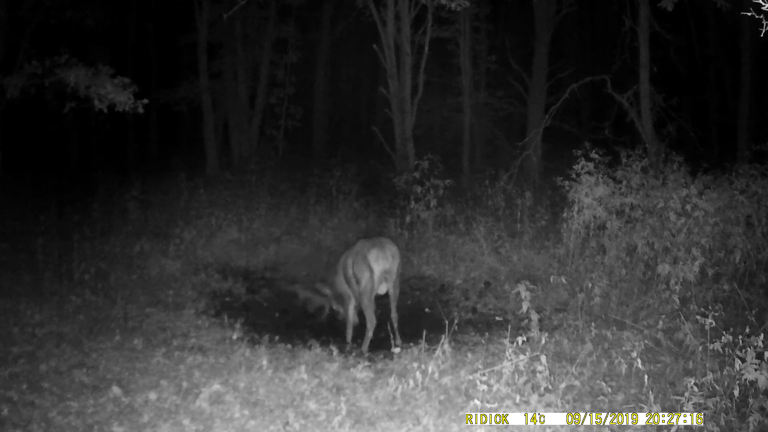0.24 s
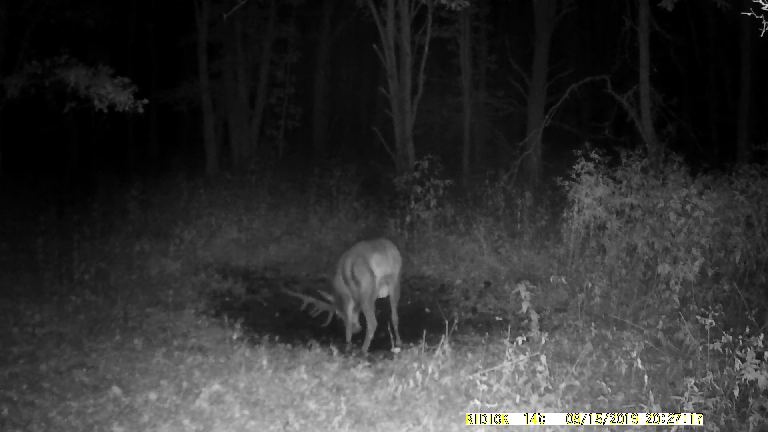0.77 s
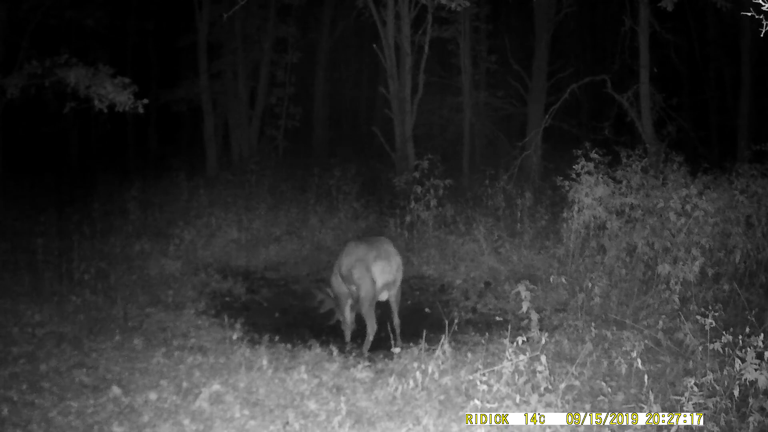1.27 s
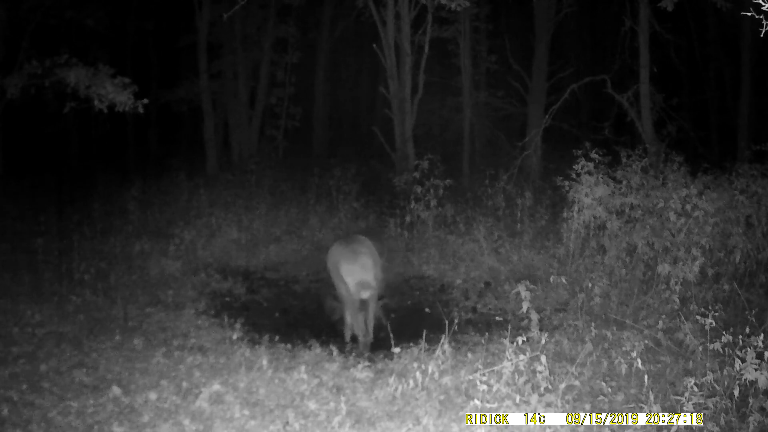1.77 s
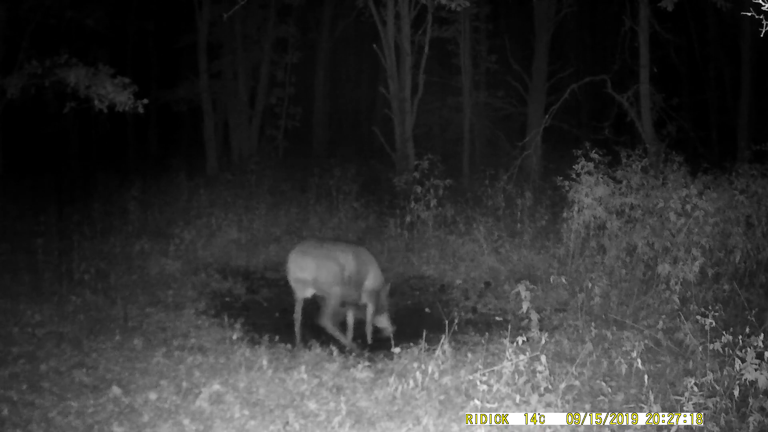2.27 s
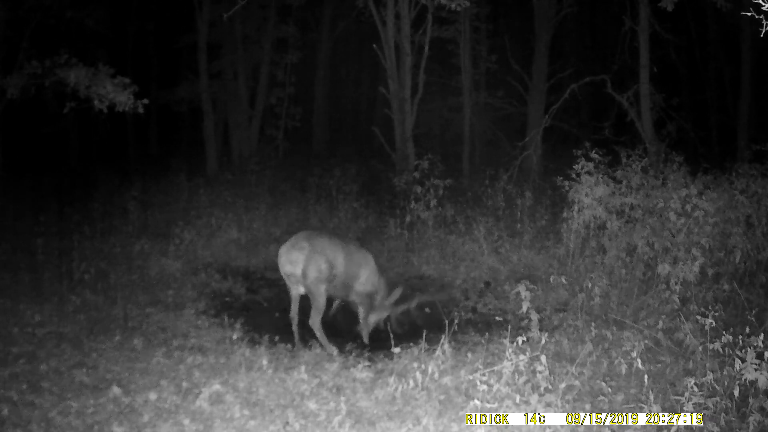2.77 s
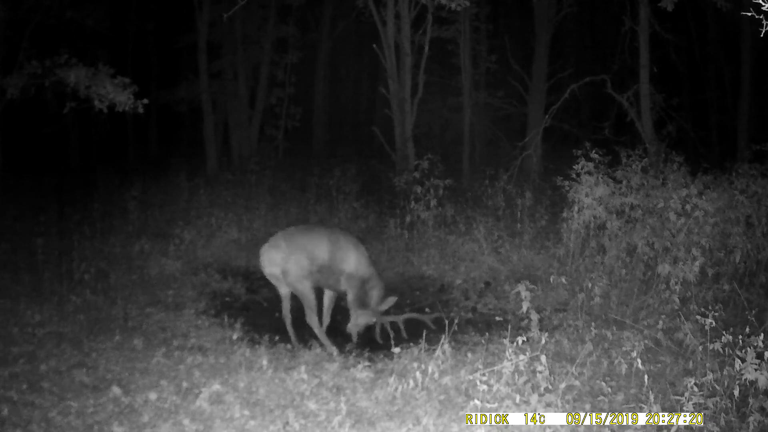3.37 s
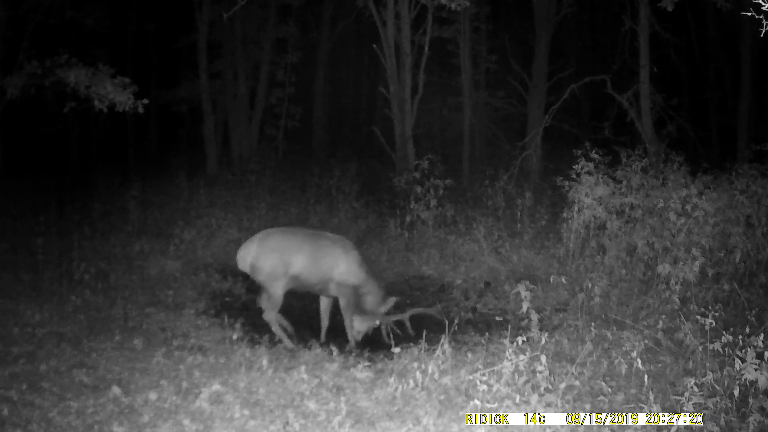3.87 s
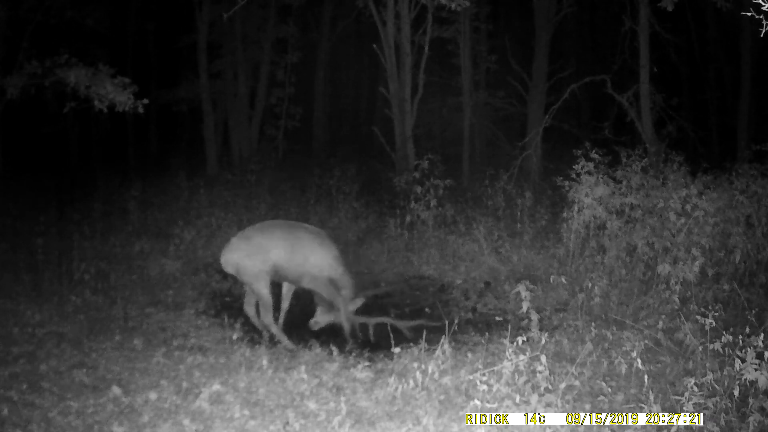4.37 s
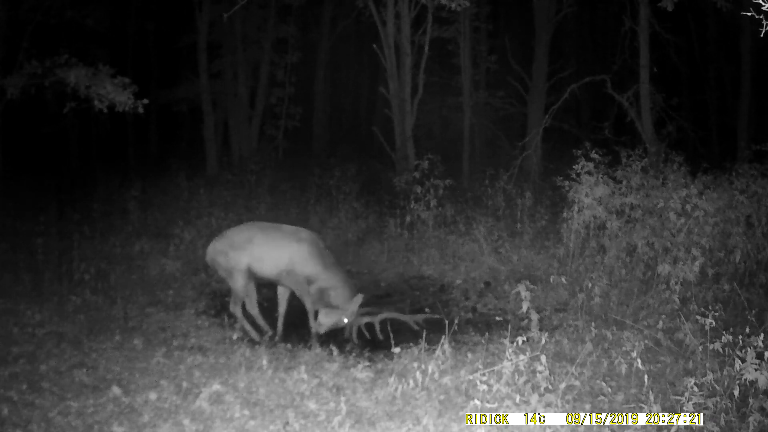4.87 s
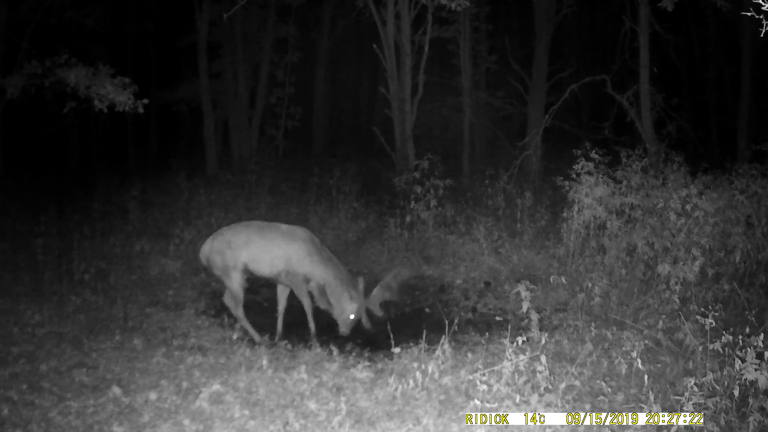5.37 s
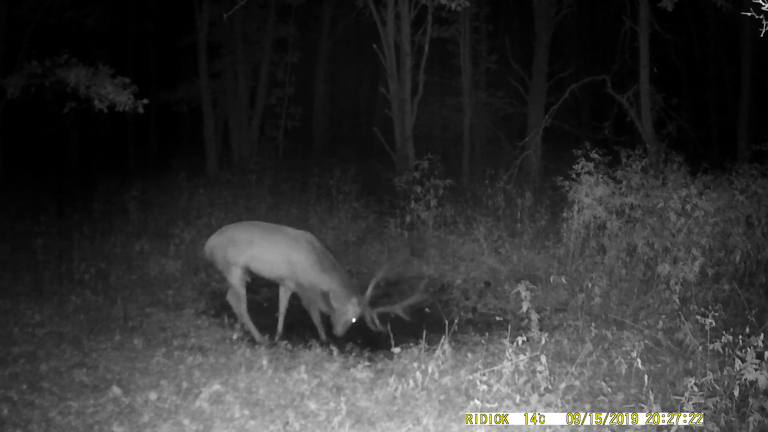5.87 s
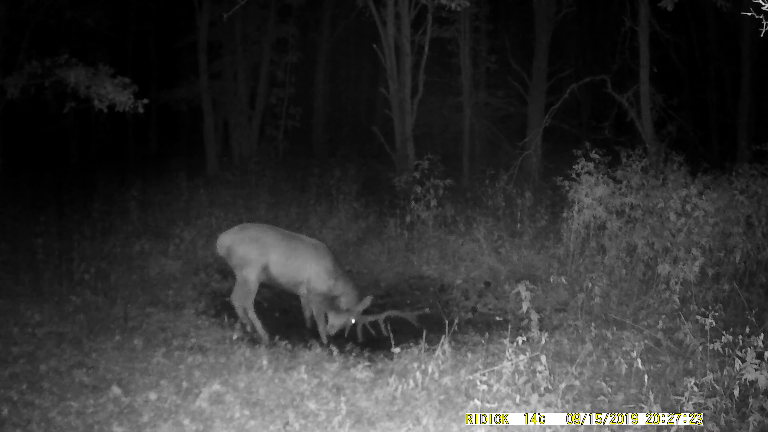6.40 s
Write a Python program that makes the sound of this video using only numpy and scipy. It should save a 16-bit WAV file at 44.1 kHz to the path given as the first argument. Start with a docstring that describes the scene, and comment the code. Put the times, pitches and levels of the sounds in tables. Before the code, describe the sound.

A bright insect rasp, about thirteen strokes a second, dominates a mono outdoor scene with recorder rumble, light hiss and a faint water trickle. After nearly a second, a deer a few metres off begins splashing in mud, with irregular wet slaps, tiny plops, spatter and surging slosh. The insect breaks off twice past the middle, then returns quieter and gradually strengthens. Trees give both sounds a brief echo.

```python
"""Night woodland. From the start a bush cricket near the microphone rasps thirteen wing strokes a second, each
a row of teeth ringing the wing, over a trickle of water, a faint distant insect chorus and the small recorder's
rumble and hiss. Soon a deer works hooves and antlers in a mud wallow some metres off: water flicks, then smacks
and plops as damped sines, and sloshes as surging noise and fine drops; insect and mud echo in the wood. The
cricket stops briefly, adds a few strokes, pauses again and resumes more softly while the mud goes on."""
import sys
import numpy as np
from scipy import signal
from scipy.fft import rfft, irfft, next_fast_len
from scipy.io import wavfile

SR = 44100
rng = np.random.default_rng(int(sys.argv[2]) if len(sys.argv) > 2 else 0)


def put_to_file(sound):
    """Save the sound as 16-bit audio at rate SR, in the file named by the first command-line argument."""
    columns = np.atleast_2d(sound).T  # one column per channel
    safe = np.clip(columns, -1, 1)
    whole_steps = np.round(safe * 32767)
    wavfile.write(sys.argv[1], SR, whole_steps.astype(np.int16))


def how_loud(loudness_db):
    """Turn decibels into a plain amplitude multiplier (0 dB gives 1, 20 dB gives 10)."""
    steps = np.asarray(loudness_db, float) / 20
    return 10 ** steps


N = 292824  # samples

# song phrases of the cricket: first_stroke_s, last_even_stroke_s, closing_drag_s
SONG_PHRASES = [(-0.0175, 3.331, .007), (3.631, 3.941, .0095), (4.383, 4.531, 0), (4.6115, 6.583, 0)]
EVEN_STROKES, CLOSING_STROKES = (45, 5, 3, 27), (2, 2, 0, 0)  # strokes per phrase
# effort of the insect: time_s, stroke_level_db
SINGING_EFFORT = [(0, -45.5), (.45, -44.5), (.74, -46), (1.6, -42.8), (2.2, -44.5), (2.85, -43.2),
                  (3.63, -45.5), (3.9, -43.5), (4.2, -44), (4.38, -58), (4.457, -50.5), (4.53, -53.5),
                  (4.61, -49.5), (4.9, -47), (5.2, -48.5), (5.95, -45.8), (6.13, -47), (6.4, -44)]
FULL_STROKE_DB = -43  # reference for stroke length and tone
# teeth of the file, met at widening intervals: position (share of stroke length), relative_level_db
FILE_TEETH = [(-.3, -20), (-.22, -20), (-.15, -16), (-.08, -13), (0, -6.5), (.08, -5.5), (.14, -4),
              (.21, -3.5), (.29, -3.5), (.39, -3), (.51, -2), (.66, -2), (0.822, -2), (1, -4.5),
              (1.202, -22)]
# wing resonances: centre_hz, width_hz, first_teeth_db, last_teeth_db, growth (dB per dB of stroke level)
WING_RESONANCES = [(5740, 5400, -26, -17, 2.5), (8450, 1474, -7, -4.5, 1.06), (8540, 310, -28, -22, 2.2),
                   (9250, 1390, -4.5, -8, 1), (10050, 1800, -0.5, -4, 1.7), (10950, 1500, -11.5, -13.5, 3)]
# ring of the leaves and trunks around the insect: frequency_hz, t60_s
WOOD_RING = [(1000, 0.19), (6000, 0.1), (8500, 0.21), (12000, 0.093)]
# trickle left between the surges: time_s, flow_db
TRICKLE_FLOW = [(0, -68), (.83, -85), (1.35, -85), (1.9, -72), (4.5, -67), (5.6, -70), (6.64, -66)]
# surges pushed by hoof or antler: crest_s, flow_db, rise_s (time to rise by 20 dB)
WATER_SURGES = [(.92, -59, .06), (1.435, -44, .03), (1.71, -47.5, .12), (1.981, -54, .08), (2.123, -58, .3),
                (2.486, -55, .2), (2.69, -61, .2), (2.796, -54.5, .2), (2.985, -51, .05), (3.12, -60, .3),
                (3.231, -53, .1), (3.62, -60, .2), (3.75, -61, .3), (3.89, -55, .17), (3.963, -51.5, .14),
                (4.115, -52, .04), (4.169, -49, .3), (4.36, -60, .2), (4.667, -57.5, .25), (4.745, -57, .3),
                (4.883, -59.5, .2), (5.749, -63, .2), (5.946, -58.5, .13), (6.264, -50, .15),
                (6.515, -51, .03), (6.625, -52.5, .06)]
# colour of the slosh hiss: frequency_hz, relative_level_db (per Hz)
SLOSH_COLOUR = [(200, -45), (500, -11), (1000, -7), (1500, -2), (2200, -4.5), (3500, -4.5), (5300, -3.5),
                (7000, -1), (11000, -8), (16000, -32)]
# colour of the steady background, the recorder's rumble and hiss with a faint distant insect chorus:
# frequency_hz, relative_level_db (per Hz)
BACKGROUND_COLOUR = [(12, -13), (20, 5.5), (44, 2), (119, -0.5), (245, -4.5), (333, -7), (1270, -18.5),
                     (4090, -24), (6940, -19), (8440, -18.5), (10500, -15), (15600, -26.5)]
# slow wavering of the whole background together: time_s, level_db
BACKGROUND_LEVEL = [(0, -60.5), (1.68, -59), (3.94, -59.5), (4.9, -62), (6.64, -59)]
# flicks of thrown water, spatter with no plop: start_s, spatter_level_db
WATER_FLICKS = [(0.8826, -46), (0.933, -48.5), (1.015, -52), (2.6055, -44), (2.924, -46.5), (2.9464, -38),
                (3.134, -48), (3.6437, -42.5), (3.8056, -49), (4.5104, -53), (4.6493, -35.5), (5.181, -52),
                (5.322, -52), (5.8629, -49.5), (5.933, -50), (6.4115, -45)]
# smacks in the mud: start_s, spatter_level_db, plop_pitch_hz, plop_level_db, length_s (of the plops)
MUD_SMACKS = [(1.403, -36.5, 1700, -47, 0.0029), (1.4242, -31.5, 1800, -62, 0.0085),
              (1.4318, -28.5, 1510, -35, 0.0058), (1.6502, -43, 1150, -41, 0.003),
              (1.6885, -31, 450, -41.5, 0.0034), (1.6957, -34, 600, -47.5, 0.01),
              (1.771, -46, 805, -56, 0.021), (2.108, -45.5, 880, -52.5, 0.005),
              (2.121, -42.5, 2000, -49, 0.005), (2.4086, -50, 764, -56.5, 0.003),
              (2.4707, -30.5, 1810, -54, 0.0039), (2.657, -39.5, 2200, -63, 0.011),
              (2.971, -38, 1100, -38, 0.013), (2.9877, -41.5, 360, -41.5, 0.0083),
              (3.2154, -39.5, 1340, -43, 0.0053), (3.241, -44, 1640, -46, 0.0066),
              (3.598, -48.5, 1610, -56, 0.0099), (3.9148, -39.5, 480, -41, 0.01),
              (3.919, -45, 1520, -39.5, 0.005), (4.1004, -44, 1580, -45.5, 0.0154),
              (4.1547, -41, 1350, -37.5, 0.011), (4.757, -41, 3300, -34.5, 0.0039),
              (5.9484, -49.5, 1490, -52, 0.015), (6.224, -45.5, 750, -55, 0.021),
              (6.2485, -55, 1640, -48, 0.0145), (6.284, -49, 1800, -44.5, 0.012),
              (6.508, -41, 3000, -50, 0.0054)]


def unit(x):
    """Scaled to rms 1."""
    return x / np.sqrt(np.mean(x ** 2) + 1e-20)


def along(points, hz):
    """(Hz, value) points read on a log axis."""
    point_hz, value = np.transpose(points)
    return np.interp(np.log(hz + 1), np.log(point_hz + 1), value)


def curve(rows):
    """(s, value) rows as one value per sample."""
    time_s, value = np.transpose(rows)
    return np.interp(np.arange(N) / SR, time_s, value)


def filtered(x, response):
    """x times a response of frequency, complex or real."""
    size = next_fast_len(N + SR // 2)
    spectrum = rfft(x, size) * response(np.fft.rfftfreq(size, 1 / SR))
    return irfft(spectrum, size)[..., :N]


def resonance(f, hz, width_hz):
    """Causal response of one resonance, 1 at its centre."""
    return 1j * f * width_hz / (hz * hz - f * f + 1j * f * width_hz)


def coloured(spectrum):
    """Noise of rms 1 with the given spectrum."""
    return unit(filtered(rng.standard_normal(N), lambda hz: how_loud(along(spectrum, hz))))


def grains(start_s, hz, cycles, gain, size=512):
    """Damped sines with a soft start, one per row, falling by 1/e over the given cycles."""
    turns = hz[:, None] * np.arange(size) / SR
    decay = np.exp(-turns / cycles)
    onset = 1 - np.exp(-2 * turns)
    wave = gain[:, None] * np.sin(2 * np.pi * turns) * decay * onset
    index = np.round(start_s * SR).astype(int)[:, None] + np.arange(size)
    return np.bincount(np.clip(index, 0, N).ravel(), wave.ravel(), N + 1)[:N]


def strokes():
    """Time, level and length of each wing stroke: an even beat whose closing strokes drag."""
    beats = []
    for (first_s, last_s, drag_s), even, closing in zip(SONG_PHRASES, EVEN_STROKES, CLOSING_STROKES):
        count = np.arange(even + closing)
        period_s = (last_s - first_s) / (even - 1)
        beats.append(first_s + count * period_s + drag_s * np.maximum(count - even + 1, 0))
    beat_s = np.concatenate(beats)
    late, loud, long = rng.standard_normal((len(beat_s), 3)).T
    late_s = .0012 * late
    level_db = np.interp(beat_s, *np.transpose(SINGING_EFFORT)) + .6 * loud
    # first to last strong tooth: soft strokes are shorter, and a late stroke is also a short one
    length_s = .035 + .0007 * (level_db - FULL_STROKE_DB) + .003 * long - 2 * late_s
    return np.array([beat_s + late_s, level_db, length_s])


def cricket():
    """Each tooth strikes the wing twice in half a millisecond; the tone sinks along the stroke."""
    stroke_s, stroke_db, length_s = strokes()[:, :, None]
    share, tooth_db = np.transpose(FILE_TEETH)
    chance = rng.standard_normal((len(stroke_s), 4, len(FILE_TEETH)))
    inner = share * (1 - share) != 0  # first and last strong teeth keep their place
    strike_s = stroke_s + length_s * (share + .013 * inner * chance[:, 0])
    gain = how_loud(-33.2 + tooth_db + chance[:, 1])  # no two teeth alike
    second_s = strike_s + .00048 + .00012 * chance[:, 2]
    second_gain = gain * how_loud(-1.5 + 1.8 * chance[:, 3])
    strike_s = np.concatenate([strike_s, second_s])
    gain = np.concatenate([gain, second_gain])
    effort_db = np.concatenate([stroke_db, stroke_db]) - FULL_STROKE_DB
    progress = np.clip(share, 0, 1) + 0 * strike_s
    index = np.round(strike_s * SR).astype(int).ravel()
    heard = (index >= 0) & (index < N)
    song = 0
    for hz, width_hz, first_db, last_db, growth in WING_RESONANCES:
        # soft strokes are thinner
        level_db = first_db + (last_db - first_db) * progress + growth * effort_db
        size = gain * how_loud(level_db + 1.2 * rng.standard_normal(strike_s.shape))
        strikes = np.bincount(index[heard], size.ravel()[heard], N)
        ring = filtered(strikes, lambda f: resonance(f, hz, width_hz) ** 2)  # squared for steep flanks
        song = song + ring * SR / (2 * width_hz)
    return song


def echoes(x):
    """Each frequency of the wood's answer dies at its own speed."""
    hz, time_s, spectrum = signal.stft(rng.standard_normal(SR // 2), SR, nperseg=128)
    decay_db = -60 * time_s / along(WOOD_RING, hz)[:, None]
    tail = signal.istft(spectrum * how_loud(decay_db), SR, nperseg=128)[1]
    return signal.fftconvolve(x, tail / np.linalg.norm(tail))[:N]


def flow():
    """Gain of the moving water: the strongest surge, swelling or draining, or else the trickle."""
    time_s = np.arange(N) / SR
    flow_db = curve(TRICKLE_FLOW)
    for crest_s, crest_db, rise_s in WATER_SURGES:
        swell_db = 20 * (crest_s - time_s) / rise_s
        drain_db = 95 * (time_s - crest_s)  # dB per second, alike for every surge
        flow_db = np.maximum(flow_db, crest_db - np.maximum(swell_db, drain_db))
    return how_loud(flow_db)


def slosh():
    """Moving water gives a wet hiss and, on it, a dense crackle of fine drops."""
    when, pitch, size = rng.random((3, 9000))
    hz = 1300 * (7000 / 1300) ** pitch ** .7
    gain = how_loud(18 * size ** 3) * hz  # most drops are small
    drops = grains(when * N / SR, hz, cycles=1.65, gain=gain, size=128)
    return flow() * (.45 * coloured(SLOSH_COLOUR) + .47 * unit(drops))


def background_noise():
    """The steady background: the recorder's rumble and hiss and a faint distant insect chorus, wavering slowly
    in level."""
    return how_loud(curve(BACKGROUND_LEVEL)) * coloured(BACKGROUND_COLOUR)


def spatter():
    """Short bright drops thrown up by flicks and smacks, the later ones smaller."""
    flick_s, flick_db = np.transpose(WATER_FLICKS)[:, :, None]
    smack_s, smack_db, _, _, length_s = np.transpose(MUD_SMACKS)[:, :, None]
    start_s = np.concatenate([smack_s, flick_s])
    level_db = np.concatenate([smack_db, flick_db])
    spread_s = 1.3 * np.concatenate([length_s, np.full_like(flick_s, .0035)])
    when, pitch, size = rng.random((len(start_s), 3, 16)).transpose(1, 0, 2)
    when[:, :4] *= .3  # the surface breaks all at once
    pitch[:, :4] = (pitch[:, :4] + np.arange(4)) / 4  # and over the whole band
    hz = 2700 * (7500 / 2700) ** pitch
    gain = how_loud(level_db - 10 * when - 2.05 * size + 4.5) * np.sqrt(hz / 4000)
    drop_s = start_s + spread_s * when
    return grains(drop_s.ravel(), hz.ravel(), cycles=1.195, gain=gain.ravel(), size=128)


def plops():
    """Hollow plops of each smack: holes in the water ring as brief damped sines."""
    start_s, _, plop_hz, plop_db, length_s = np.transpose(MUD_SMACKS)[:, :, None]
    when, pitch, size = rng.random((len(start_s), 3, 7)).transpose(1, 0, 2)
    when[:, 0] = 0
    pitch = (pitch + np.arange(7)) / 7  # from wide holes to narrow ones
    hz = plop_hz * 2 ** (1.45 * (pitch - .5) * (when > 0))  # the first plop has the listed pitch
    gain = how_loud(plop_db - 12.6 * when - 3.1 * size + 7) * np.sqrt(hz / plop_hz)
    return grains((start_s + length_s * when).ravel(), hz.ravel(), cycles=1.05, gain=gain.ravel())


def scene():
    """Insect and mud both echo in the wood; the slosh is already diffuse."""
    insect = cricket()
    mud = spatter() + plops()
    wood = echoes(how_loud(-6.5) * insect + how_loud(-10.5) * mud)
    return (insect + mud + wood + slosh())[None]


def microphone(sound):
    """The microphone's port adds a slight peak, and its treble falls off steeply."""
    def colour(f):
        port = 1 + how_loud(.5) * resonance(f, 5405, 760)
        treble_edge = 1 / np.sqrt(1 + (f / 11150) ** 16)
        return port * treble_edge
    return filtered(sound, colour)


def band_limit(x):
    """A steep low-pass at the top of the band."""
    return signal.sosfilt(signal.butter(12, 15720, fs=SR, output="sos"), x)


def record(dry):
    """Microphone colour, the steady background of rumble, hiss and distant insects, and its band limit."""
    noisy = microphone(dry) + background_noise()
    mix = filtered(noisy, lambda hz: hz < 15800)
    return band_limit(mix)


dry = scene()
out = record(dry)
put_to_file(out)
```